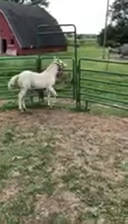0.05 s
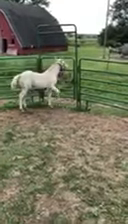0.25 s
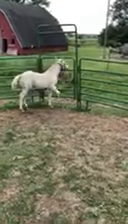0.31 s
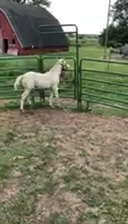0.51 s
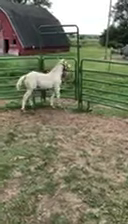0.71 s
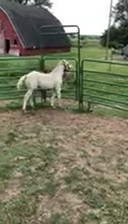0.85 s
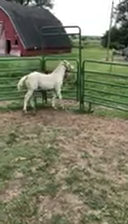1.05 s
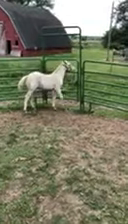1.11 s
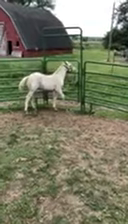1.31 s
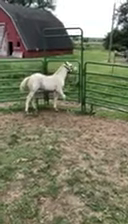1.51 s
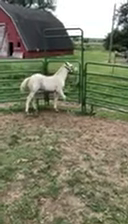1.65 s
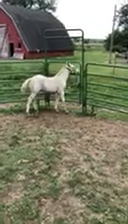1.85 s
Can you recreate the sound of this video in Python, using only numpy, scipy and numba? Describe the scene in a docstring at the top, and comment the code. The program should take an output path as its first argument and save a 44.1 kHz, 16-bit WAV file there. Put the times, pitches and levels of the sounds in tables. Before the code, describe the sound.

A steel corral panel clanks loudly and rings, then rattles lightly, over faint crickets.

```python
"""Horse against a steel corral panel

A young horse knocks a pipe panel: one loud clank chatters and rings away, then two light bumps follow.
Each impact excites the modes of pipes and frame; the late bumps also ring the adjoining gate.
Small steel fittings, probably the gate chain, jingle as the panel shakes, and hooves thud softly.
Crickets trill steadily by stridulation, with short falling chirps, over a faint outdoor rumble."""
import sys
import numpy as np
from scipy import signal
from scipy.fft import rfft, irfft, next_fast_len
from scipy.io import wavfile
from scipy.ndimage import map_coordinates
from numba import njit

SR = 44100
rng = np.random.default_rng(int(sys.argv[2]) if len(sys.argv) > 2 else 0)


def master(y):
    """Save y as 16-bit WAV."""
    cut = np.clip(np.atleast_2d(y).T, -1, 1)
    pcm = np.round(cut * 32767)  # scale
    wavfile.write(sys.argv[1], SR, pcm.astype(np.int16))


N = 83790
TIME = np.arange(N) / SR


def amp(db):
    """Decibels as an amplitude ratio."""
    return 10 ** (np.asarray(db) / 20)


def unit(x):
    """Normalisation to rms 1."""
    return x / np.sqrt(np.mean(x ** 2) + 1e-20)


def along(points, hz):
    """Interpolation of (frequency, value) points on a logarithmic frequency axis."""
    point_hz, values = np.transpose(points)
    return np.interp(np.log(hz + 1), np.log(point_hz + 1), values)


def filtered(x, gain):
    """Zero-phase filtering: the spectrum is multiplied by gain(hz)."""
    size = next_fast_len(len(x) + 8192)
    return irfft(rfft(x, size) * gain(np.fft.rfftfreq(size, 1 / SR)), size)[:len(x)]


def noise(spectrum):
    """Spectral shaping of white noise, scaled to rms 1."""
    return unit(filtered(rng.standard_normal(N), lambda hz: amp(along(spectrum, hz))))


def wobble(knots_per_s):
    """Smooth random modulation: a spline through Gaussian values."""
    return map_coordinates(rng.standard_normal(4096), [TIME * knots_per_s], mode="wrap")


def add(track, start_s, sound):
    """Superposition of a sound on the track from start_s."""
    start = int(np.clip(round(start_s * SR), 0, N - 1))
    track[start:start + len(sound)] += sound[:N - start]


@njit
def free_decay(poles, state, count):
    """Free vibration of damped oscillators: their sum and their final state."""
    out, phasors = np.zeros(count), state.copy()
    for i in range(count):
        for k in range(len(phasors)):
            out[i] += phasors[k].imag
            phasors[k] *= poles[k]
    return out, phasors


def ring(hz, t60, contacts, scatter_db=2.5, phase_kick=0.46):
    """Modal synthesis: each contact (start_s, rise_s, mode_db) adds energy and jolts the phases."""
    out, onset_time = np.zeros(N), TIME[:SR // 10]
    edges = [int(np.clip(round(start_s * SR), 0, N)) for start_s, _, _ in contacts] + [N]
    poles = np.exp((2j * np.pi * hz - np.log(1000) / np.maximum(t60, .1)) / SR)
    state = 1e-10 * np.exp(2j * np.pi * rng.random(len(hz)))
    for start, stop, (start_s, rise_s, mode_db) in zip(edges, edges[1:], contacts):
        push = amp(mode_db + scatter_db * rng.standard_normal(len(hz)))
        jolt = phase_kick * np.arctan2(push, abs(state)) * rng.standard_normal(len(hz))
        struck = np.hypot(abs(state), push) * np.exp(1j * (np.angle(state) + jolt))
        transient, _ = free_decay(poles, state - struck, len(onset_time))
        add(out, start_s, transient * np.exp(-onset_time / rise_s))  # the new ring eases in
        tone, state = free_decay(poles, struck, max(stop - start, 0))
        add(out, start_s, tone)
    return out


# Spectrum of the outdoor air: frequency_hz, relative_density_db
AIR_SPECTRUM = [(20, -10.5), (45, -4), (80, -1), (130, -2), (250, -8.5), (500, -11), (1000, -15.5),
                (2000, -19), (3600, -23.5), (5000, -62.5), (6000, -45.5), (10000, -65)]


def rumble(level_db=-66.5, sway_db=-0.5):
    """Broadband ambient noise, strongest in the bass, with a slight random sway in level."""
    return amp(level_db + sway_db * wobble(11)) * noise(AIR_SPECTRUM)


# Lower and upper bands of the distant crickets: frequency_hz, relative_density_db
LOW_BAND = [(3300, -35), (3900, -10.5), (4300, -0.5), (4650, 5.5), (5150, 0), (5300, -8), (5450, -53),
            (5700, -88)]
HIGH_BAND = [(6100, -72.5), (6450, -28.5), (6750, -24), (6950, -13.5), (7450, -13), (7620, -1.5), (7950, 2),
             (8400, -2.5), (8850, -2), (9020, -9), (9200, -22), (10200, -32), (10800, -76)]


def cricket_chorus(low_db=-62.5, high_db=-59, trill_hz=86.4, trill_db=1, swell_db=-0.13):
    """Incoherent summation: countless distant crickets merge into two fluttering bands of noise."""
    out = np.zeros(N)
    for spectrum, level_db in [(LOW_BAND, low_db), (HIGH_BAND, high_db)]:
        band = noise(spectrum)
        flutter_db = trill_db * wobble(2 * trill_hz) + swell_db * wobble(5.2)
        out += band * amp(level_db + flutter_db)
    return out


# Wing strokes of the nearest crickets: centre_s, pitch_hz, level_db (before the low-pass)
NEAR_CHIRPS = [(.044, 4760, -50.5), (.084, 5160, -46.5), (.664, 4720, -61), (.704, 4650, -55.5),
               (.75, 4460, -53), (.817, 5080, -53), (.852, 4870, -52), (.9, 5040, -46.5),
               (1.129, 5110, -52.5), (1.168, 4496, -55.5), (1.268, 4790, -52.5), (1.353, 4970, -49.5),
               (1.49, 4670, -63.5), (1.521, 4700, -53), (1.616, 4970, -53.5), (1.733, 4670, -55.5),
               (1.788, 4650, -52.5)]


def cricket_chirps(far_count=50, width_s=0.0064, fall_hz_per_s=28700, cutoff_hz=5130):
    """Stridulation: each wing stroke is a tone pulse of falling pitch, a few near and many far."""
    out, t = np.zeros(N), np.arange(-SR // 40, SR // 40) / SR
    far_s = rng.random(far_count) * N / SR
    far_hz = rng.normal(4818, 170, far_count)
    far_db = rng.normal(-58.5, 0.83, far_count)
    envelope = np.exp(-.5 * (t / width_s) ** 2)
    for centre_s, pitch_hz, level_db in [*NEAR_CHIRPS, *zip(far_s, far_hz, far_db)]:
        cycles = pitch_hz * t - fall_hz_per_s * t ** 2 / 2 + rng.random()
        add(out, centre_s + t[0], amp(level_db) * envelope * np.sin(2 * np.pi * cycles))
    return filtered(out, lambda hz: 1 / (1 + (hz / cutoff_hz) ** 70))


# Modes of the steel pipes: frequency_hz, relative_level_db, t60_s
PIPE_MODES = [(951, -28.5, 0.42), (1362, -15.5, 0.2), (1610, -26.0, 0.8), (1694, -19.0, 1.13),
              (1727, -17.5, 1.42), (1757, -23.0, 1.8), (1779, -24.0, 1.8), (1844, -15.0, 0.75),
              (1863, -26.5, 2.02), (1887, -23.5, 1.07), (1965, -23.5, 0.9), (1985, -24.5, 1.13),
              (2012, -16.5, 0.9), (2016, -27.0, 2.2), (2035, -24.0, 1.2), (2105, -27.0, 1.0),
              (2230, -23.5, 1.01), (2257, -16.0, 1.3), (2289, -23.5, 0.9), (2373, -26.5, 0.85),
              (2390, -22.0, 0.95), (2411, -27.0, 2.26), (2427, -22.5, 0.71), (2448, -25.0, 0.95),
              (2545, -17.5, 0.63), (2576, -22.5, 0.9), (2598, -21.0, 0.6), (2729, -17.5, 0.63),
              (2747, -12.0, 0.45), (2852, -13.0, 0.5), (2879, -6.0, 0.28), (2900, -16.5, 0.53),
              (2918, -11.0, 0.2), (2977, -8.0, 0.19), (3017, -18.0, 0.4), (3201, -16.5, 0.95),
              (3229, -12.0, 0.47), (3379, -9.0, 0.2), (3427, -16.5, 0.5), (3537, -16.5, 0.3),
              (3588, 0.5, 0.38), (3608, -14.0, 0.42), (3964, -17.5, 0.3), (4004, -20.5, 0.56),
              (4091, -22.0, 0.75), (4122, -17.5, 0.28), (4696, -23.0, 0.5), (4784, -16.5, 0.63),
              (4809, -15.0, 0.75), (4856, -16.5, 0.67), (4925, -12.0, 0.6), (4949, -8.0, 0.4),
              (5109, -9.5, 0.47), (5212, -4.5, 0.24), (5236, -14.0, 0.53), (5339, -15.5, 0.6),
              (5372, -17.0, 0.6), (5555, -14.5, 0.42), (5743, -14.5, 0.33), (5763, -18.0, 0.53),
              (5907, -12.5, 0.14), (5991, -7.0, 0.28), (6014, -9.0, 0.32), (6260, -23.5, 0.6),
              (6325, -19.5, 0.45), (6545, -21.5, 0.22)]


def pipe_modes(mistuning=0.0037, neighbour_db=-13.5, t60_ratio=1.37):
    """Beating: each pipe mode pairs with a weaker, slightly mistuned one in a neighbouring rail."""
    hz, db, t60 = np.transpose(PIPE_MODES)
    detune = mistuning * (.5 + rng.random(len(hz))) * rng.choice([-1, 1], len(hz))
    neighbours = [hz * (1 + detune), db + neighbour_db, t60 * t60_ratio]
    return np.hstack([[hz, db, t60], neighbours])


def pipe_response(hz, half_width_hz=10.7):
    """Resonance: the gain peaks at each pipe mode, above a floor of 1."""
    peaks = sum(1 / (1 + ((hz - mode_hz) / half_width_hz) ** 4) for mode_hz, _, _ in PIPE_MODES)
    return np.sqrt(1 + peaks)


# Mode strength in the welded frame: frequency_hz, relative_level_db
FRAME_SPECTRUM = [(400, -16), (520, 2), (680, -11), (930, -13), (1230, -10), (1400, -4), (1900, -1),
                  (3000, 1), (3750, -23.5), (4900, -0.5), (6000, -26), (6900, -5), (8200, 1.5),
                  (9800, -2.5)]
# Damping of the frame: frequency_hz, t60_s
FRAME_DECAY = [(400, 0.24), (1200, 1), (1800, 1), (3000, 1), (5000, 0.93), (9000, 0.88)]


def frame_modes(count=320, total_db=-15.5):
    """High modal density: the frame has many weak modes, closer together in the low range."""
    grid_hz = np.linspace(np.sqrt(FRAME_SPECTRUM[0][0]), np.sqrt(FRAME_SPECTRUM[-1][0]), count) ** 2
    hz = grid_hz + np.gradient(grid_hz) * (rng.random(count) - .5)
    db = along(FRAME_SPECTRUM, hz)
    power_sum_db = 10 * np.log10(np.sum(amp(db) ** 2))
    return np.array([hz, db - power_sum_db + total_db, along(FRAME_DECAY, hz)])


# Contacts with the panel: start_s, level_db, tilt_db_per_octave, clatter_offset_db, rise_s
PANEL_KNOCKS = [(0.2167, -30, -1.5, 4, 0.00047), (0.2224, -36, 0.5, 7.5, 0.00049),
                (.247, -38.5, -3.5, 8, .0008), (0.262, -36, 6.5, -0.5, .003), (.387, -51.5, -3, 11, .004),
                (0.433, -52.5, 0.5, -7, .006), (.515, -58, -6.5, 9, .005), (0.719, -56, -6.5, 2.5, 0.0099),
                (1.812, -54.5, -3, 10.5, 0.012), (1.874, -64, 2, 13, 0.0063)]
# Clatter of steel on steel: frequency_hz, relative_density_db
CLATTER_SPECTRUM = [(100, -44), (330, -39), (520, -23), (680, -22.5), (900, -2.5), (1200, -13.5),
                    (1500, 1.5), (2900, 2.5), (5200, 1.5), (7000, -8.5), (9500, -7), (11000, -31)]


def panel(tilt_pivot_hz=3110, base_clatter_t60_s=0.06):
    """Impact excitation: every contact rings the same pipes and frame and adds a burst of clatter."""
    hz, db, t60 = np.hstack([pipe_modes(), frame_modes()])
    octaves = lambda f: np.log2((f + 100) / tilt_pivot_hz)
    contacts = [(start_s, rise_s, db + level_db + tilt * octaves(hz))
                for start_s, level_db, tilt, _, rise_s in PANEL_KNOCKS]
    out = ring(hz, t60, contacts)
    steel_noise = unit(filtered(noise(CLATTER_SPECTRUM), pipe_response))
    for start_s, level_db, tilt, clatter_offset_db, rise_s in PANEL_KNOCKS:
        shifted_noise = np.roll(steel_noise, rng.integers(N))
        clatter = filtered(shifted_noise, lambda f: amp(tilt * octaves(f)))
        clatter_t60_s = base_clatter_t60_s + 10 * rise_s
        envelope = (1 - np.exp(-TIME / rise_s)) * amp(-60 * TIME / clatter_t60_s)
        add(out, start_s, clatter * envelope * amp(level_db + clatter_offset_db))
    return out


# Shakes of the chain: start_s, ring_db, rattle_db, rattle_pitch_hz
CHAIN_SHAKES = [(.265, -61.5, -47, 8600), (0.289, -64, -41.5, 7880), (.423, -61, -43.5, 9070),
                (.915, -59.5, -47.5, 8528), (.943, -56.5, -51.5, 7750)]
# Modes of the links: frequency_hz, relative_level_db, t60_s
LINK_MODES = [(7914, -2, .8), (7960, -2, 1), (8047, -6, .75), (8214, -3, .9), (8275, -7, .5), (8461, 2, .4),
              (8616, -2, 1.4), (8798, -5, .35)]


def chain(rise_s=0.0014, rattle_width_hz=194, rattle_t60_s=0.2, highpass_hz=3900):
    """Small bodies resonate high: the links rattle in a short uneven burst and ring on in the treble."""
    hz, db, t60 = np.transpose(LINK_MODES)
    out = ring(hz, t60, [(start_s, rise_s, db + ring_db) for start_s, ring_db, *_ in CHAIN_SHAKES])
    envelope = (1 - np.exp(-TIME / rise_s)) * amp(-60 * TIME / rattle_t60_s)
    for start_s, _, rattle_db, pitch_hz in CHAIN_SHAKES:
        collisions = rng.standard_normal(N) * amp(0.94 * wobble(260))
        resonance = lambda f: 1 / (1 + ((f - pitch_hz) / rattle_width_hz) ** 2) ** 0.85
        rattle = unit(filtered(collisions, resonance))
        add(out, start_s, amp(rattle_db) * envelope * rattle)
    return filtered(out, lambda f: 1 - 1 / (1 + (f / highpass_hz) ** 20))


# Soft hoof falls on the dirt: start_s, level_db
HOOF_FALLS = [(0.453, -65), (0.922, -56.5), (0.987, -59), (1.313, -52.5)]


def hooves(pitch_hz=74, rise_s=0.0075):
    """Heavy damping: a hoof on dirt gives a low thud that dies within a few cycles."""
    out = np.zeros(N)
    envelope = TIME / rise_s * np.exp(1 - TIME / rise_s)
    thud = envelope * np.sin(2 * np.pi * pitch_hz * TIME)
    for start_s, level_db in HOOF_FALLS:
        add(out, start_s, amp(level_db) * thud)
    return out


# Nudges that reach the gate: start_s, gain_db
GATE_NUDGES = [(1.821, 5.5), (1.874, -4)]
# Modes of the gate: frequency_hz, level_db
GATE_MODES = [(950, -70.5), (1078, -68.5), (1260, -68.5), (1760, -62.5), (1884, -57.5), (1995, -64),
              (2557, -61.5), (2880, -61), (4055, -64), (5550, -66), (6255, -79)]


def gate(t60_s=0.41, rise_s=0.0052):
    """Structure-borne excitation: the late bumps ring the adjoining gate at its natural frequencies."""
    hz, db = np.transpose(GATE_MODES)
    return ring(hz, t60_s, [(start_s, rise_s, db + gain_db) for start_s, gain_db in GATE_NUDGES])


def scene(steel_highpass_hz=420):
    """Superposition in mono; the steel is high-passed so its attacks carry no low thump."""
    highpass = signal.butter(2, steel_highpass_hz, "highpass", fs=SR, output="sos")
    steel = signal.sosfilt(highpass, panel() + gate() + chain())
    return (steel + cricket_chirps() + cricket_chorus() + rumble() + hooves())[None]


def record(dry, cutoff_hz=10050):
    """Band limiting: a steep low-pass removes the highest treble."""
    lowpass = lambda hz: 1 / np.sqrt(1 + (hz / cutoff_hz) ** 160)
    return np.array([filtered(channel, lowpass) for channel in dry])


dry = scene()
out = record(dry)
master(out)
```